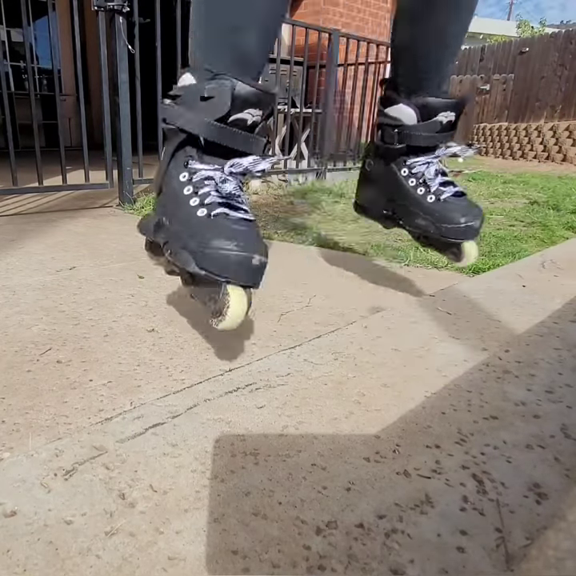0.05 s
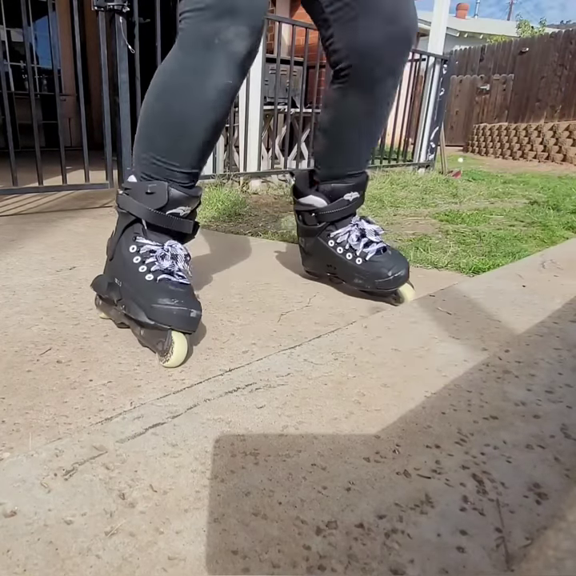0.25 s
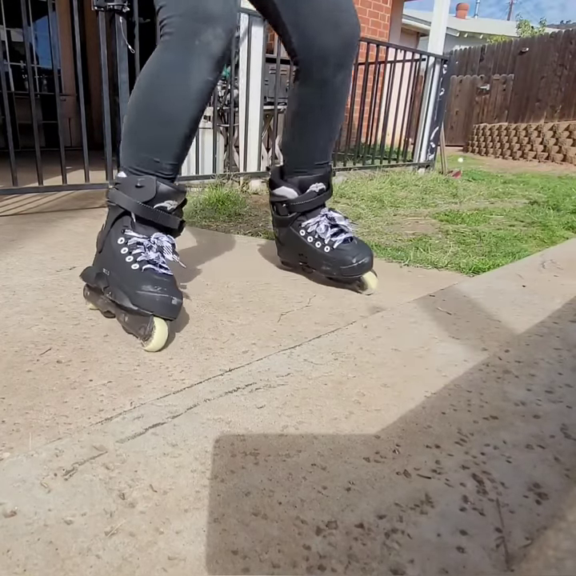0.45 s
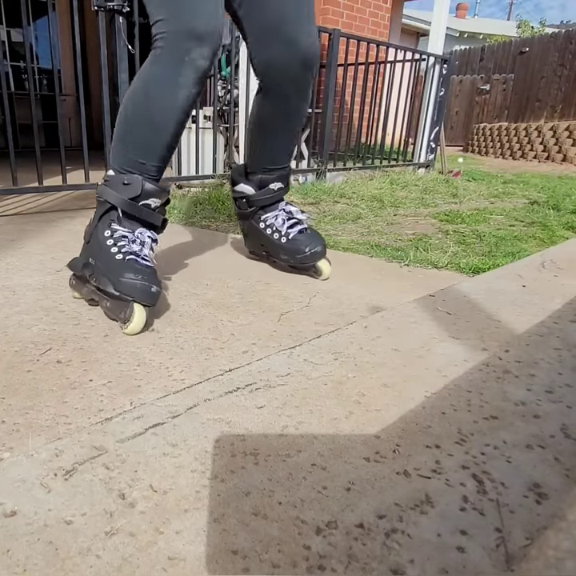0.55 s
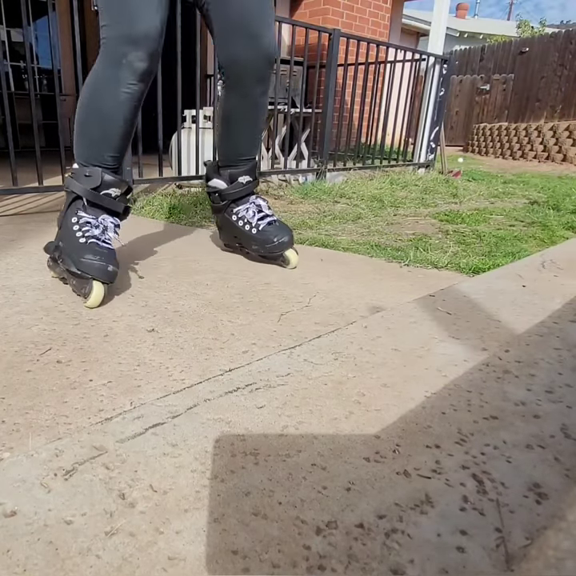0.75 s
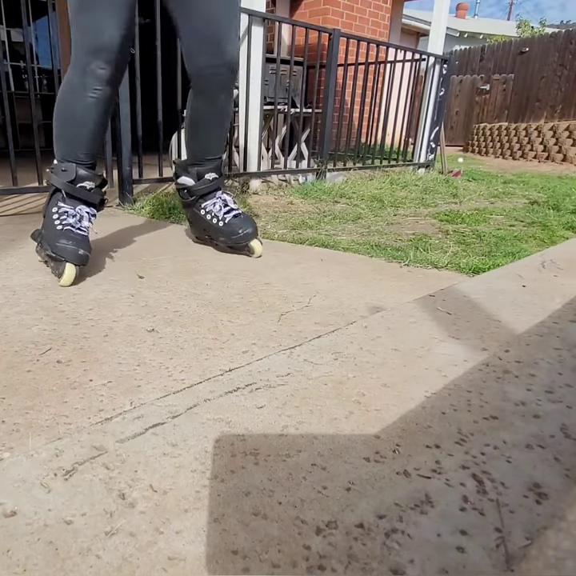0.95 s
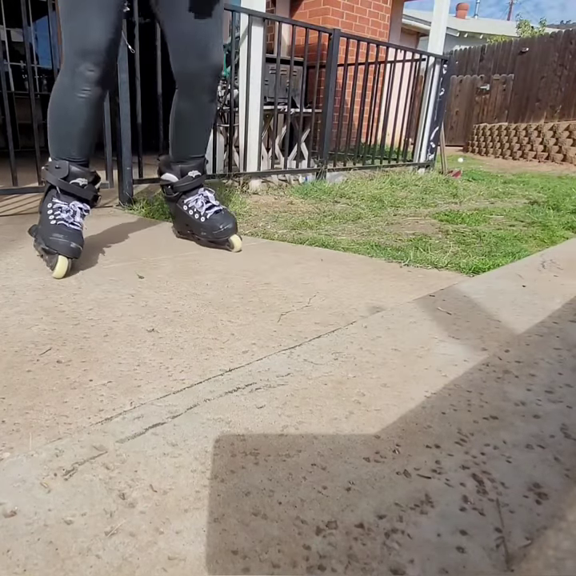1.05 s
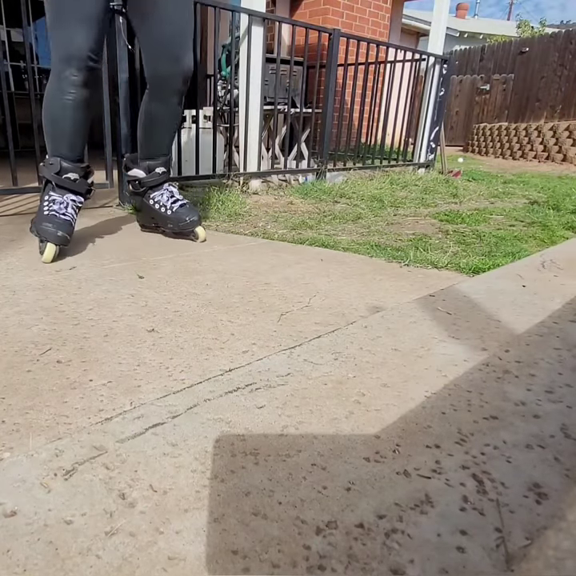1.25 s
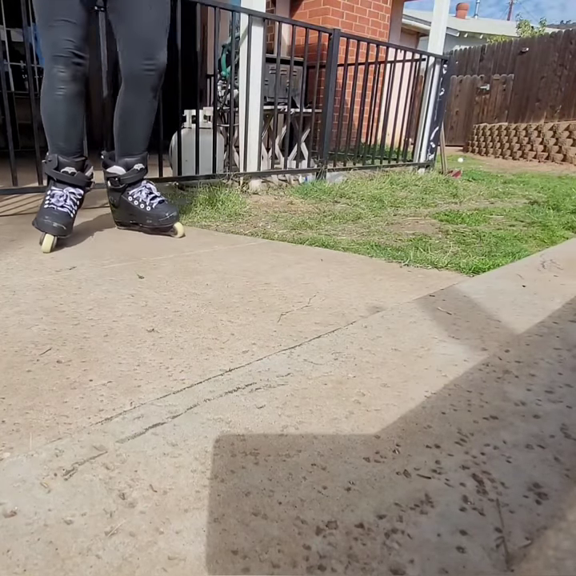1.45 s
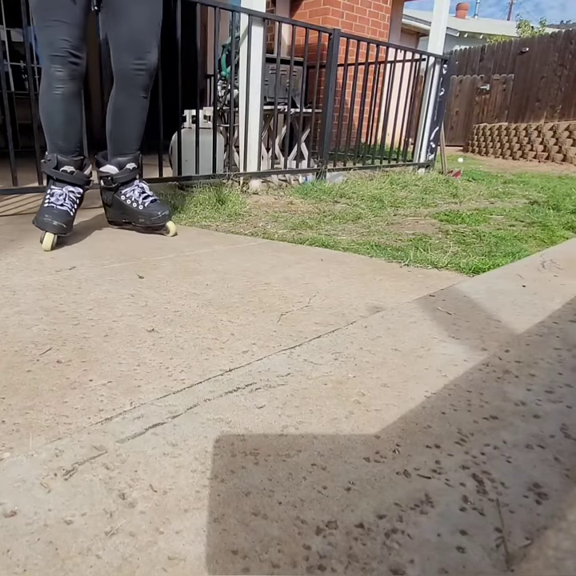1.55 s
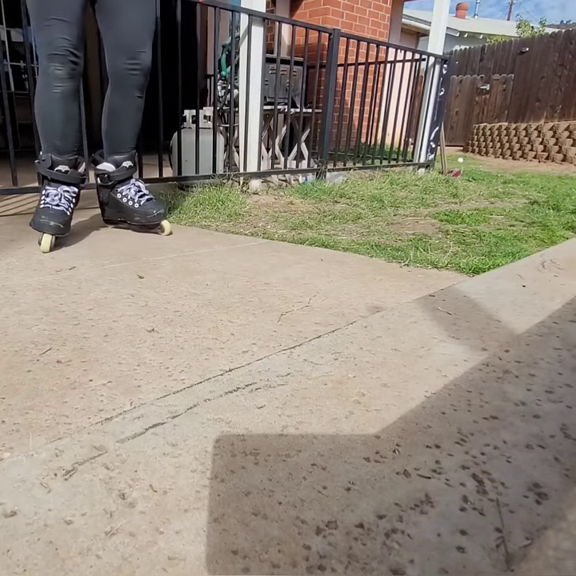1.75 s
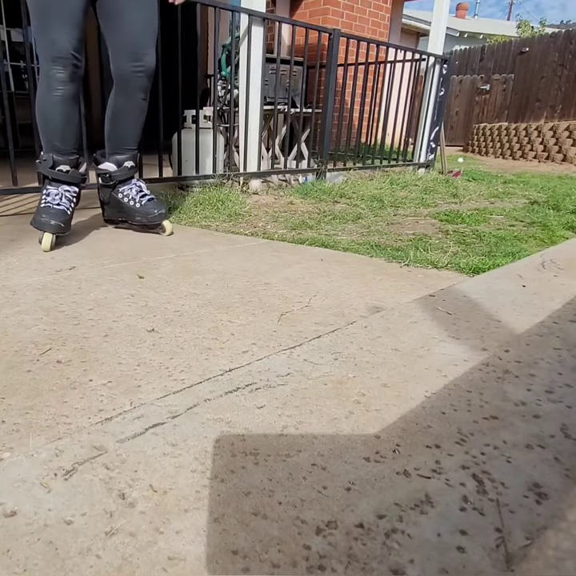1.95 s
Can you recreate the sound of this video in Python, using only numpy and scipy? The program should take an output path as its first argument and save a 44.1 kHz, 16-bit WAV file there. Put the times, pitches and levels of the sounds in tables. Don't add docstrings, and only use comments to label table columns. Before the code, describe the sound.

Inline skates scuff and whirr briefly, slam onto concrete with a sharp clattering thud, then roll off with small ticks and soft jolts, ending in a short wheel scrape; outdoor yard, stereo microphone near the ground.

```python
import sys
import numpy as np
from scipy import signal
from scipy.io import wavfile

SR = 44100
rng = np.random.default_rng(int(sys.argv[2]) if len(sys.argv) > 2 else 0)


def level_to_linear(level):
    exponent = np.asarray(level, float) / 20
    return 10 ** exponent


def to_wav(s):
    ch = np.atleast_2d(s).T
    pcm = np.round(np.clip(ch, -1, 1) * 32767)
    wavfile.write(sys.argv[1], SR, pcm.astype(np.int16))


N = 88200


def rms_one(x):
    return x / np.sqrt(np.mean(x ** 2) + 1e-20)


def level(rows, edge_s=.01):
    s, db = np.transpose(rows)
    times = [s[0] - edge_s, *s, s[-1] + edge_s]
    return level_to_linear(np.interp(np.arange(N) / SR, times, [-110, *db, -110]))


def at_hz(points, hz):
    table_hz, value = np.transpose(points)
    return np.interp(np.log(hz), np.log(table_hz), value)


def drift(rate_hz):
    r = np.exp(-80 * np.pi * rate_hz / SR)
    slow = signal.lfilter([1], [1, -2 * r, r * r], rng.standard_normal(N // 40 + 2002))[2000:]
    return np.interp(np.arange(N) / 40, np.arange(len(slow)), rms_one(slow))


def ring(clicks, hz, t60):
    r, w = level_to_linear(-60 / (t60 * SR)), 2 * np.pi * hz / SR
    return signal.lfilter([0, np.sin(w)], [1, -2 * r * np.cos(w), r * r], clicks + 1e-18)


def bandpass(x, edges_hz):
    return signal.sosfilt(signal.butter(2, edges_hz, "band", fs=SR, output="sos"), x)


def split(pan_db):
    return np.array([[.5], [-.5]]) * pan_db


# frequency in Hz, left-right likeness from -1 to 1.
LIKENESS = [(60, 0.62), (150, 0.67), (300, 0.74), (600, 0.028), (1200, -0.15), (4000, -0.25),
            (12000, -0.18)]


def hiss(spectrum, patchy_db, rate_hz):
    out, together = 0, drift(rate_hz)
    edges = 22 * 2 ** np.arange(0, 9.6, .5)
    white = rng.standard_normal((2, 2, N))
    table = [(spectrum[0][0] / 2, spectrum[0][1] - 20), *spectrum]
    for k, (low, high) in enumerate(zip(edges, edges[1:])):
        mid, side = bandpass(white[k % 2], [low, high])
        hz = np.sqrt(low * high)
        alike = np.clip(at_hz(LIKENESS, hz), -1, 1)
        gain = level_to_linear(at_hz(table, hz) + patchy_db * (together + 0.54 * drift(rate_hz)))
        out = out + gain * (np.sqrt(1 + alike) * mid + np.sqrt(1 - alike) * side * [[1], [-1]])
    return rms_one(out)


def clicks_at(s, db, pan_db):
    out = np.zeros((2, N))
    out[:, (s * SR).astype(int)] = level_to_linear(db + split(pan_db))
    return out


def strike(modes, s, db, pan_db, spread_db, ear_db):
    luck = rng.standard_normal((len(s), len(modes), 3))
    out = 0
    for k, (hz, mode_db, t60) in enumerate(modes):
        right_sign = np.sign(at_hz(LIKENESS, hz) - .2) if k % 2 and hz > 700 else 1
        hit_db = db + mode_db + spread_db * luck[:, k, 0]
        clicks = clicks_at(s, hit_db, pan_db + ear_db * luck[:, k, 1])
        out = out + ring(clicks * [[1], [right_sign]], hz, t60)
    return out


def dying(s, db, pan_db, t60):
    return signal.lfilter([1], [1, -level_to_linear(-60 / (t60 * SR))], clicks_at(s, db, pan_db))


# frequency in Hz, density in dB per Hz.
CRACK = [(800, 19.5), (2000, 14), (5000, 6.5), (7500, 2), (11000, -3), (15000, 0)]


def contact_crack():
    return hiss(CRACK, patchy_db=1.5, rate_hz=90)


# start in seconds, thud in dB, clack in dB, crack in dB, pan in dB.
LANDING = [(0.2445, -23, -42, -38, -26.5), (0.2481, -8.5, -17.5, -19, -1), (0.2558, -23, -3, -12.5, 10.5),
           (.2610, -15.5, -33, -48.5, -5), (0.28, -24.5, -35.5, -16, 25), (0.2814, -9, -7.5, -16.5, 6),
           (0.2849, -3.5, -15, -51.5, 2), (0.2882, -14, -11.5, -36, 15), (0.2912, -6, -19, -32, -3),
           (.3000, -29, -33, -42, -2), (.3160, -26, -27, -35, -12.5)]
# mode in Hz, level in dB, t60 in seconds.
BOOT = [(91.4, -27, 0.37), (167, -7, 0.087), (252.8, -2, 0.077), (320, -20, 0.062), (410, 1.5, 0.035),
        (526, -6.5, 0.018), (715, -5, 0.028)]
# mode in Hz, level in dB, t60 in seconds.
FRAME = [(905, -2.5, 0.019), (1020, 5.5, 0.021), (1370, -12, 0.02), (1600, -3, 0.011), (2440, -6.5, 0.016),
         (3000, -9.5, 0.059), (3970, -21, 0.017), (4866, -10, 0.11), (6000, -46.5, 0.0072)]


def landing(crack):
    s, thud_db, clack_db, crack_db, pan_db = np.transpose(LANDING)
    thud = strike(BOOT, s, thud_db - 4.5, 0 * pan_db, spread_db=3.0, ear_db=1.3)
    thud = signal.sosfilt(signal.butter(2, 1520, fs=SR, output="sos"), thud)
    clack = strike(FRAME, s, clack_db - 13.5, 0.3 * pan_db, spread_db=-0.5, ear_db=7.0)
    contact = dying(s, crack_db, pan_db, t60=0.011)
    skid = dying(s, crack_db - 13, 0 * s, t60=0.18)
    return thud + clack + crack * (contact + skid)


# mode in Hz, level in dB, t60 in seconds.
HEEL = [(506, -1, 0.039), (750, 1, 0.036), (1036, -1.5, 0.026), (1277, -6, .025), (1476, 0, .04),
        (2716, -20, .04)]


def heel():
    s, thud_db, clack_db, _, pan_db = np.transpose(LANDING)
    blow_db = np.maximum(thud_db, clack_db) - 17
    return strike(HEEL, s, blow_db, 0.41 * pan_db, spread_db=5.5, ear_db=1.0)


# time in seconds, level in dB.
BOUNCE = [
    (.29, -29),
    (.4, -42),
    (.5, -60.5),
    (.62, -55),
    (.65, -75),
]


def wheel_bounce():
    return level(BOUNCE) * rms_one(bandpass(rng.standard_normal(N), [60, 159]))


# start in seconds, peak in dB, crack over clack in dB, ringing part in Hz.
TICKS = [(.017, -23.5, -16, 2600), (.0705, -30.5, -16, 3000), (.084, -33, -11, 3000),
         (.1037, -33.5, -21, 3380), (.1226, -28, -36, 2420), (.163, -36.5, 4.5, 6640),
         (.2305, -28.5, 1, 7050), (.424, -34, 3, 5860), (.435, -30.5, 3.5, 3000), (.4673, -29.5, 1, 6100),
         (.5566, -32.5, -9, 1560), (.604, -30.5, -3, 4600), (.6045, -27.5, -12.5, 1600),
         (.6055, -37, -15, 905), (.656, -38.5, -1.5, 4530), (.704, -42, -4, 2150), (.7432, -45, -2, 2220),
         (.8155, -40.5, 1.5, 3260), (1.103, -44, -8, 1020), (1.65, -45.5, -5.5, 1500),
         (1.683, -51, 3.5, 6000)]
# start in seconds, peak in dB, crack over clack in dB, ringing part in Hz.
SLIPS = [(1.741, -36.5, 7.5, 3000), (1.7442, -24, 0.5, 6000), (1.7730, -32, 9.5, 930), (1.781, -38, 6, 890),
         (1.803, -29.5, 2.5, 910), (1.816, -34, -5, 830), (1.83, -26, -12, 402)]


def knocks(rows, crack, body, t60, thud_db):
    s, db, crack_db, part_hz = np.transpose(rows)
    rattle_s, rattle_loss_db = 0.001097, 13
    short = [(hz, mode_db, 0.55 * t) for hz, mode_db, t in FRAME]
    out = 0
    for k in range(3):
        chatter_db = db - 18 - k * rattle_loss_db
        out = out + strike(short, s + k * rattle_s, chatter_db, 0 * s, spread_db=4.0, ear_db=2.0)
    for start, peak_db, hz in zip(s, db, part_hz):
        clicks = clicks_at(start + np.array([0, rattle_s]), peak_db - 6, np.array([-1, 1]))
        out = out + ring(clicks, hz, .004 + 11 / hz / 2)
    out = out + crack * dying(s, db + crack_db - 4.0, 0 * s, t60)
    return out + strike(body, s, db + thud_db, 0 * s, spread_db=0.0, ear_db=3.0)


# start in seconds, level in dB rms, centre in Hz, t60 in seconds.
SNAPS = [(0.164, -51, 9000, .03), (.1955, -46, 10000, 0.03), (.213, -44, 11800, 0.035),
         (0.218, -42, 11000, 0.02), (0.2293, -41.5, 9000, 0.059), (0.242, -48, 13000, 0.064),
         (0.2487, -28.5, 8560, 0.011), (0.254, -34, 5000, .01), (0.2784, -17, 10300, 0.013),
         (0.2964, -30, 12500, 0.023), (0.8147, -51, 10100, .03), (0.861, -59, 12500, .03),
         (.9, -60, 8000, .03), (.953, -58, 10500, 0.025), (1.098, -58, 12100, 0.027),
         (1.609, -61.5, 11500, .03), (1.616, -57.5, 11600, 0.025), (1.772, -49, 11800, 0.033),
         (1.818, -42.5, 12000, .02)]


def snaps():
    out, length = np.zeros((2, N)), 4000
    for s, db, hz, t60 in SNAPS:
        edges = np.minimum(hz * 2 ** (0.55 * np.array([-1, 1])), 20000)
        burst = rms_one(bandpass(rng.standard_normal((2, length)), edges))
        fade_db = -60 * np.arange(length) / SR / t60
        out[:, int(s * SR):int(s * SR) + length] += burst * level_to_linear(db + split(4.5) + fade_db)
    return out


# time in seconds, level in dB.
ROLL = [(.28, -19.5), (.36, -40.5), (.42, -41.5), (.48, -43.5), (.52, -47.5), (.62, -48), (.68, -57.5),
        (.8, -53), (.95, -54), (1.1, -62), (1.15, -53.5), (1.2, -48.5), (1.35, -50.5), (1.48, -53),
        (1.6, -64), (1.73, -62.5), (1.76, -47), (2, -69.5)]
# frequency in Hz, density in dB per Hz.
ROLL_COLOUR = [(100, -9.5), (220, -9.5), (380, 0.5), (620, -11), (1200, -10.5), (2500, -13.5), (6000, -23),
               (15000, -29.5)]


def rolling():
    grains_per_s, spread_db, cycles, bearing_hz = 2000, 3.6, 5.0, 2150
    sizes = level_to_linear(spread_db * np.minimum(rng.exponential(1, N), 3)) * rng.choice([-1, 1], N)
    born = rng.random(N) < grains_per_s * level_to_linear(4 * drift(15)) / SR
    dealt, pan_db = rng.integers(0, 24, N), rng.normal(0, 1, (2, N))
    grit = 0
    for k, hz in enumerate(np.geomspace(200, 12000, 24)):
        clicks = sizes * born * (dealt == k) * level_to_linear(pan_db * np.log(hz / 100))
        grit = grit + ring(clicks, hz, cycles / hz) * level_to_linear(at_hz(ROLL_COLOUR, hz)) * np.sqrt(hz)
    bearing = ring(rng.standard_normal((2, N)), bearing_hz, 2.2 / 230)
    bearing = bearing + level_to_linear(-11) * ring(rng.standard_normal((2, N)), 1.54 * bearing_hz, 0.0099)
    sings = level([(1.19, 1), (1.24, 2), (1.27, -12), (1.3, 10), (1.385, 13), (1.41, -8)])
    rumble = 0.8 * hiss(ROLL_COLOUR, patchy_db=2.0, rate_hz=46)
    return level(ROLL) * (rumble + level_to_linear(1) * rms_one(grit) + level_to_linear(-15) * sings * rms_one(bearing))


# start in seconds, peak in dB, ringing in Hz.
BUMPS = [(.338, -29, 327), (.340, -22, 155), (.372, -29.5, 110), (0.389, -38, 250), (0.398, -39, 110),
         (.430, -40, 133), (.455, -36, 85), (0.489, -37, 90), (0.491, -49, 342), (.543, -34.5, 104),
         (0.563, -32, 480), (.603, -41, 94), (.606, -31.5, 367), (0.744, -41, 343), (.825, -38.5, 298),
         (0.918, -37.5, 330), (1.14, -45, 345), (1.162, -39, 380), (1.186, -33, 370), (1.208, -38, 372),
         (1.229, -35.5, 382), (1.258, -43, 382), (1.279, -36, 350), (1.315, -39, 367), (1.336, -37, 398),
         (1.35, -42, 410), (1.388, -38, 395), (1.42, -43, 447), (1.476, -44, 450), (1.697, -46, 277),
         (1.744, -30.5, 910), (1.747, -32.5, 430), (1.9, -38, 376)]


def bumps():
    out, cycles = 0, 10.5
    for s, db, hz in BUMPS:
        start = np.array([s])
        out = out + ring(clicks_at(start, db, 0), hz, cycles / hz)
        out = out + ring(clicks_at(start, db - 6, 0), 2.6 * hz, cycles / hz / 2)
    return out


# time in seconds, level in dB.
SCRAPE = [
    (1.738, -79),
    (1.745, -44.5),
    (1.82, -41.5),
    (1.87, -54.5),
    (1.93, -64),
    (2, -101),
]
# frequency in Hz, density in dB per Hz.
SCRAPE_COLOUR = [(400, 5), (900, 0.5), (2900, -2), (7000, -15), (15000, -19.5)]


def dragged_wheel():
    return level(SCRAPE) * hiss(SCRAPE_COLOUR, patchy_db=1.5, rate_hz=59)


# time in seconds, level in dB.
SCUFF = [
    (0, -33),
    (.022, -29),
    (.03, -34.5),
    (.06, -48),
    (.11, -57),
]
# frequency in Hz, density in dB per Hz.
SCUFF_COLOUR = [(59, -32), (100, 0.5), (450, -5.5), (1880, -9), (2990, -9.5), (6480, -18.5), (11900, -17.5),
                (15000, -27.5)]


def take_off_scuff():
    return level(SCUFF) * hiss(SCUFF_COLOUR, patchy_db=1.5, rate_hz=21)


# time in seconds, level in dB.
SPIN = [
    (.11, -52),
    (.125, -42),
    (.17, -40),
    (.24, -43.5),
]
# frequency in Hz, density in dB per Hz.
SPIN_COLOUR = [(900, -15.5), (1700, -8), (2300, -11.5), (3500, -19), (5200, -31), (9000, -38)]


def free_wheels():
    return level(SPIN) * hiss(SPIN_COLOUR, patchy_db=2.0, rate_hz=42)


def aside(x):
    return np.array([x[0], np.roll(x[1], 6)]) * level_to_linear(split(-0.17))


def yard(x):
    t60_s, wall_cut_hz = 0.46, 4600
    out, dull = np.zeros((2, N)), np.exp(-2 * np.pi * wall_cut_hz / SR)
    for k, lag in enumerate((rng.uniform(.012, .05, 12) * SR).astype(int)):
        loop, gain, state = x.copy(), level_to_linear(-60 * lag / SR / t60_s), [0.]
        for i in range(lag, N, lag):
            sent = loop[i - lag:i]
            back, state = signal.lfilter([gain * (1 - dull)], [1, -dull], sent, zi=state)
            loop[i:i + lag] += back[:N - i]
        out[k % 2] += (loop - x) * (-1) ** (k // 2)
    return out


# frequency in Hz, level in dB rms.
HUM = [(81, -64.5), (119.5, -61), (178, -70.5), (240, -61.5)]
# time in seconds, level in dB.
MAINS = [
    (0, 2.5),
    (.6, 2.5),
    (.85, -1.5),
    (1.15, 4.5),
    (1.4, -11),
    (2, -13),
]


def hum():
    t, out = np.arange(N) / SR, 0
    for k, (hz, db) in enumerate(HUM):
        line = np.sin(2 * np.pi * hz * t + 0.56 * drift(2.3))
        waver = level(MAINS) if k == 1 else 1
        out = out + np.sqrt(2) * level_to_linear(db + 1.7 * drift(15.0)) * line * waver
    return out


# frequency in Hz, density in dB per Hz.
AIR = [(40, 6), (80, -3.5), (200, -7.5), (350, -5.5), (800, -23.5), (3000, -51), (15000, -42)]
# time in seconds, gain in dB.
GAIN = [
    (0, 11.5),
    (.24, 10.5),
    (.3, -8),
    (.62, -4),
    (.7, 4),
    (1.6, 1.5),
    (2, 7.5),
]


def background():
    air = level_to_linear(-57) * hiss(AIR, patchy_db=-4.15, rate_hz=7.1)
    return level(GAIN) * (air + hum())


def scene():
    crack = contact_crack()
    hits = landing(crack) + heel() + snaps()
    hits = hits + knocks(TICKS, crack, BOOT, t60=0.035, thud_db=-23.0)
    hits = hits + knocks(SLIPS, crack, BOOT[3:], t60=0.024, thud_db=-14.5)
    rubs = dragged_wheel() + take_off_scuff() + free_wheels()
    echoes = level_to_linear(-22) * yard(hits.mean(axis=0))
    return hits + echoes + aside(rubs + rolling() + bumps() + background()) + wheel_bounce()


def low_pass(x):
    return signal.sosfilt(signal.butter(12, 15960, fs=SR, output="sos"), x)


def record(dry):
    x = signal.sosfilt(signal.butter(4, 56.4, "high", fs=SR, output="sos"), dry)
    x = 1.1 * np.tanh(x / 1.1)
    x = signal.sosfilt(signal.cheby2(14, 27, 14850, fs=SR, output="sos"), x)
    x = signal.sosfilt(signal.cheby2(10, 50, 16300, fs=SR, output="sos"), x)
    return low_pass(x)


dry = scene()
out = record(dry)
to_wav(out)
```